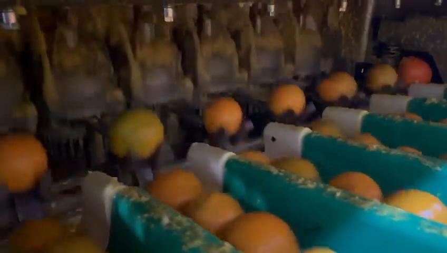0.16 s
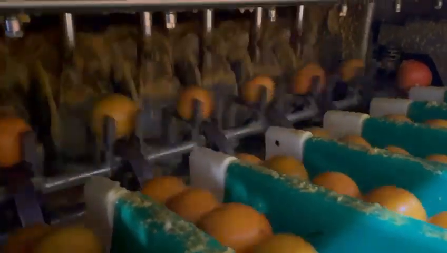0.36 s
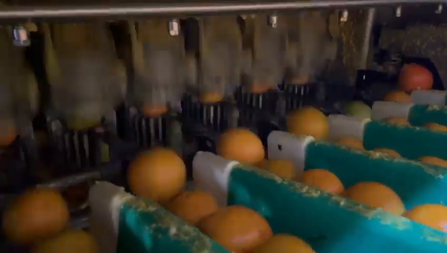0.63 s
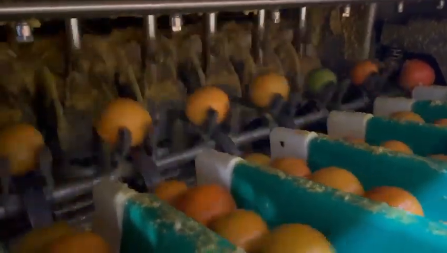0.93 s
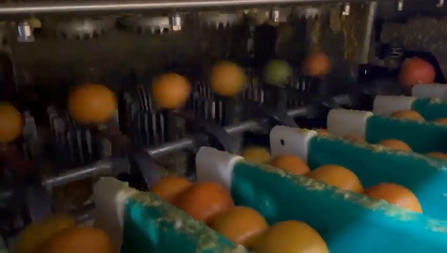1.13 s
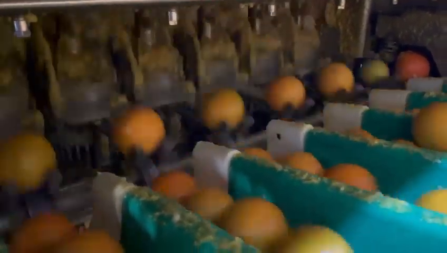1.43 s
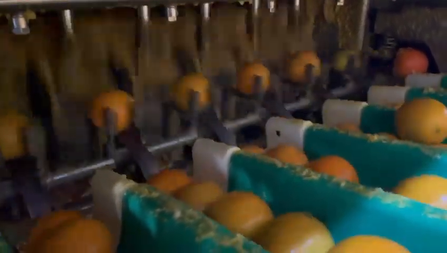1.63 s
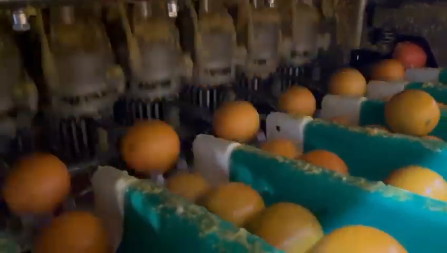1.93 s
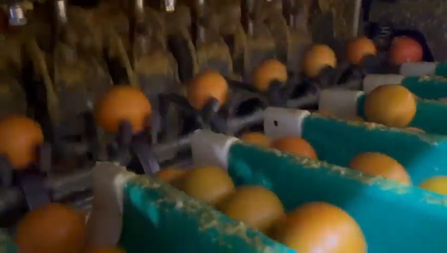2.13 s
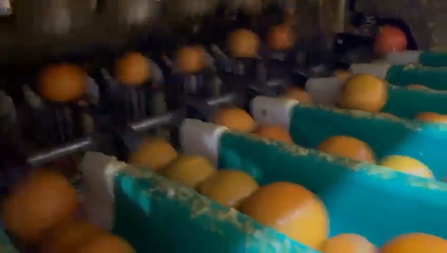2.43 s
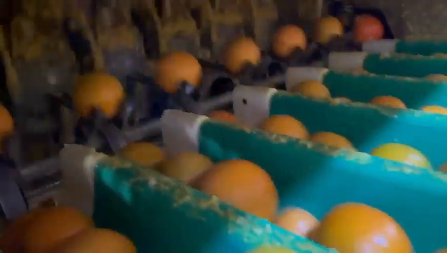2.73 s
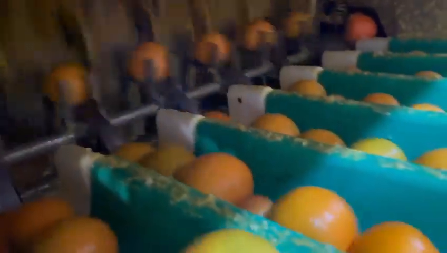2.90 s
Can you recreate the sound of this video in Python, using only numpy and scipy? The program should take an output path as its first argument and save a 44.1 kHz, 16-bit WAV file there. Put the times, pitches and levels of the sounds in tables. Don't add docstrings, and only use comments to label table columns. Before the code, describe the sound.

A citrus juicing machine pounds about every 0.6 seconds: peel crunches and juice hisses, the frame booms, then steel fingers clack and fruit knocks down chutes, over motor hum in a loud factory, heard close up on a phone.

```python
import sys
import numpy as np
from scipy import signal
from scipy.fft import rfft, irfft
from scipy.io import wavfile
from scipy.ndimage import uniform_filter1d

SR = 44100
rng = np.random.default_rng(int(sys.argv[2]) if len(sys.argv) > 2 else 0)


def convert_level_to_amplitude(level_db):
    exponent = np.asarray(level_db, float) / 20
    return 10 ** exponent


def log_audio(samples):
    frames = np.atleast_2d(samples).T
    limited = np.clip(frames, -1, 1)
    pcm = np.round(limited * 32767).astype(np.int16)
    wavfile.write(sys.argv[1], SR, pcm)


N = 134946

# crush/dB, spray/dB, boom/dB, frame/dB
STROKES = [(-16, -6, 4.5, -2.5), (5, 8.5, -1, 0), (1.5, 5.5, -1, 1.5), (4, 7.5, 1.5, 2.5),
           (1.5, 5.5, -0.5, 1), (4, 7.5, 0.5, -0.5)]
STARTS_S = [-.625, 0.0, .632, 1.253, 1.877, 2.5]
# f/Hz, level/dB
CRUSH_TONE = [(250, -15.5), (600, 2.5), (1200, 0.5), (2000, -4), (3400, -1), (5000, -9.5), (8000, -13.5),
              (12000, -23.5)]


def curve(table, at):
    p = np.array(table, float)
    return np.interp(np.log(at + 1), np.log(p[:, 0]), p[:, 1])


def shape(x, gain):
    return irfft(rfft(x) * gain(np.fft.rfftfreq(N, 1 / SR)), N)


def unit(x):
    return x / np.sqrt(np.mean(x ** 2))


def walk(rate):
    k = int(SR / rate)
    held = np.repeat(rng.standard_normal(N // k + 1), k)
    return unit(uniform_filter1d(uniform_filter1d(held, k), k)[:N])


def grains(tone, rough_db, flicker_db, rate):
    x = rfft(rng.standard_normal((2, N)) * convert_level_to_amplitude(rough_db * rng.exponential(size=N)))
    f = np.fft.rfftfreq(N, 1 / SR)
    out = 0
    for k in range(10):
        octave = np.cos(np.pi / 2 * np.clip(np.log2((f + 1) / 25) - k, -1, 1)) ** 2
        band = convert_level_to_amplitude(curve(tone, f)) * octave
        out = out + irfft(x * band, N) * convert_level_to_amplitude(flicker_db * walk(rate))
    return unit(out)


def ring(x, hz, t60):
    return signal.lfilter([1], [1, -np.exp((2j * np.pi * hz - np.log(1000) / t60) / SR)], x).imag


def burst(at, decay, rise=0.0043):
    t = np.maximum(np.arange(N) / SR - at, 0)
    return np.exp(-t / decay) * np.minimum(t / rise, 1)


def effort(table, column):
    t, p = np.arange(N) / SR, np.array(table, float)
    power = 0
    for start, stroke in zip(STARTS_S, STROKES):
        level_db = np.interp(t - start, p[:, 0], p[:, 1], left=-90, right=-90)
        power = power + convert_level_to_amplitude(2 * (level_db + stroke[column]))
    return np.sqrt(power)


def press():
    # t/s after its start, level/dB
    crush_effort = [(.1, -67), (.17, -43.5), (.235, -42.5), (.262, -26), (.295, -29), (.325, -35),
                    (.39, -43.5), (.47, -38.5), (.58, -53)]
    spray_effort = [(.08, -90), (.17, -43), (.24, -45.5), (.275, -33), (.32, -46), (.39, -60), (.46, -42),
                    (.5, -69), (.58, -68)]
    boom_effort = [(.15, -30), (.24, -21.5), (.32, -18), (.385, -29.5), (.42, -20), (.5, -19.5), (.58, -24),
                   (.7, -29.5), (.8, -43.5)]
    # f/Hz, level/dB
    spray_tone = [(1500, -30), (3000, -14), (5000, -5), (8000, -1.5), (10000, -0.5), (12500, -9.5)]
    boom_tone = [(60, -30), (150, -13), (300, 0), (500, -0.5), (800, -9.5), (1300, -16), (2500, -30.5),
                 (6000, -42.5)]
    crush = effort(crush_effort, column=0) * grains(CRUSH_TONE, rough_db=2.5, flicker_db=2.2, rate=60)
    spray = effort(spray_effort, column=1) * grains(spray_tone, rough_db=1.5, flicker_db=3.0, rate=36)
    boom = effort(boom_effort, column=2) * grains(boom_tone, rough_db=3, flicker_db=1.1, rate=20)
    return crush + spray + boom


def frame():
    # f/Hz, width/Hz, level/dB, struck t/s into the stroke, decay/s
    resonances = [(101.66, 22, -26, 0.388, 0.2), (207.5, 29, -20, 0.2206, 0.15),
                  (319.6, 15, -21, 0.289, 0.19), (448.4, 17, -23.5, 0.252, 0.13),
                  (553.5, 11, -26.5, 0.265, 0.1), (786, 10, -28, 0.428, 0.15),
                  (1010, 30, -33.5, .27, 0.093), (1618, 42, -40.5, .3, 0.28)]
    rise_s, rough_share = 0.024, 0.52
    push, t = rng.standard_normal((2, N)), np.arange(N) / SR
    out = 0
    for hz, width, db, at, decay in resonances:
        shake = sum(convert_level_to_amplitude(stroke[3]) * burst(start + at, decay, rise_s)
                    for start, stroke in zip(STARTS_S, STROKES))
        steady = np.sin(2 * np.pi * (hz * t + 0.08 * walk(12) + np.array([[0], [.25]])))
        rough = unit(ring(push, hz, 2.24 / width))
        out = out + convert_level_to_amplitude(db) * shake * (steady + rough_share * rough)
    return out


def fingers():
    # f/Hz, level/dB, t60/s
    modes = [(2223, 0, .06), (2900, -9, .03), (3482, 0, .07), (3591, -6, .05), (3390, -9, .04),
             (4105, -2, .08), (4560, -2, .04), (4700, -2, .04), (5319, -6, .05), (5480, -6, .03)]
    # t/s, ring/dB, low modes/dB, high modes/dB, crack/dB
    clacks = [(.4095, -42, -12, 5, -29), (1.038, -31, -16, -3, -30), (1.659, -31, -6, 4, -22),
              (2.2812, -34, -2, 0, -33), (2.7604, -38, -16, -1, -18), (2.9083, -40, -8, -15, -31),
              (2.997, -36, -4, -2, -26)]
    contact_s, crack_s = .0015, 0.015
    out, crack, t = np.zeros((2, N)), np.zeros(N), np.arange(SR // 18) / SR
    chatter_db = np.tile(1.8 * walk(160), 2)
    envelope = np.minimum(t / contact_s, 1) * np.cos(np.pi / 2 * t / t[-1])
    for s, db, low_db, high_db, crack_db in clacks:
        luck, at = rng.random((len(modes), 3)), int(s * SR)
        for (hz, mode_db, t60), (turn, other, size) in zip(modes, luck):
            share_db = low_db if hz < 3000 else high_db if hz > 3700 else 0
            level_db = db + mode_db + share_db + 3 * size + chatter_db[at:at + len(t)] - 60 * t / t60
            tone = np.sin(2 * np.pi * (hz * t + np.array([[turn], [other]])))
            out[:, at:at + len(t)] += (convert_level_to_amplitude(level_db) * envelope * tone)[:, :N - at]
        crack += convert_level_to_amplitude(crack_db) * burst(s, crack_s, contact_s)
    return out + crack * grains(CRUSH_TONE, rough_db=2, flicker_db=0, rate=5)


def pings():
    # t/s, f/Hz, level/dB,
    # t60/s
    rods = [(.335, 3200, -33, .1), (.342, 2500, -30, .05), (0.39, 3850, -35, 0.12), (.372, 3500, -37, .6),
            (.42, 2560, -41, 0.092), (.905, 2150, -30, 0.11), (1.045, 2580, -33, 0.22),
            (.95, 2900, -34, 0.22), (.985, 3470, -42, .3), (.996, 3480, -35, .2), (1.038, 3490, -26, .15),
            (1.09, 5570, -37, .15), (1.502, 1293, -23, 0.41), (1.525, 1870, -31, .2),
            (1.667, 4105, -27, .08), (1.659, 4640, -26, .05), (1.664, 3490, -25, .08),
            (1.658, 2223, -21, .085), (1.66, 5420, -31, .05), (2.286, 3400, -34, .07),
            (2.298, 3490, -33, .12), (2.29, 4120, -38, .12), (2.284, 5300, -38, .05),
            (2.36, 2100, -42, .15), (1.9, 2800, -34, .06), (2.21, 3400, -37, .08)]
    # t/s, f/Hz, level/dB, t60/s
    thumps = [(.3, 203, -17.5, 0.33), (.9, 289, -19, 0.27), (.94, 220, -21, .3), (1.041, 430, -20, .3),
              (1.3, 205, -22, 0.34), (1.54, 453, -22, .3), (1.66, 399, -22, 0.28), (1.74, 330, -20, .3),
              (1.84, 381, -22, 0.33), (2.16, 298, -21, 0.33), (2.201, 203, -19, 0.32),
              (2.77, 554, -18, 0.35), (.46, 97, -19, .4), (.92, 96, -20, .4), (1.74, 103, -19, .4),
              (2.26, 102, -19, .4), (2.88, 96, -20, .4)]
    struck = rods + thumps
    out, t = np.zeros((2, N)), np.arange(SR // 14) / SR
    chatter_db = np.tile(2.5 * walk(120), 2)
    for (s, hz, db, t60), turn in zip(struck, rng.random((len(struck), 2, 1))):
        at = int(s * SR)
        level = convert_level_to_amplitude(db + chatter_db[at:at + len(t)] - 60 * t / t60)
        envelope = np.minimum(t / (.003 + 3 / hz), 1) * np.cos(np.pi / 2 * t / t[-1])
        phase = turn[0] + (turn - turn[0]) * min(hz / 2000, 1)
        out[:, at:at + len(t)] += level * envelope * np.sin(2 * np.pi * (hz * t + phase))
    return out


def knocks():
    # t/s, level/dB, centre f/Hz, decay/s
    ticks = [(.008, -28.5, 3270, 0.021), (0.141, -25.5, 3600, 0.021), (.49, -27.5, 4700, 0.0081),
             (0.809, -33, 5130, 0.018), (0.893, -25, 2140, 0.019), (1.031, -27, 3900, 0.017),
             (1.088, -34, 5500, 0.014), (.845, -27, 10000, 0.018), (.92, -31, 10000, 0.022),
             (1.688, -35, 10000, 0.025), (1.424, -33.5, 5030, 0.018), (1.489, -29, 1400, 0.025),
             (1.691, -49, 2460, 0.025), (1.747, -29, 4900, 0.019), (1.765, -30.5, 3600, 0.01),
             (1.882, -28, 3450, 0.012), (2.05, -33.5, 5500, 0.018), (2.1126, -26, 4040, 0.0092),
             (2.145, -20.5, 2920, 0.016), (2.3311, -31.5, 5040, 0.017), (2.669, -34, 4500, 0.013),
             (2.709, -30, 4000, 0.009), (2.849, -26, 4000, 0.0071)]
    out = np.zeros((2, N))
    noise = signal.lfilter([1, -1], [1, -.8], rng.standard_normal((2, N)))
    for s, db, hz, decay in ticks:
        part = slice(int(s * SR), int(s * SR) + SR // 8)
        tone = unit(ring(noise[:, part], hz, 2.8 / hz)) + 0.13 * noise[:, part]
        out[:, part] += convert_level_to_amplitude(db) * burst(s, decay)[part] * tone
    return out


def chain():
    # f/Hz, t60/s, level/dB
    link = [(4680, 0.016, -7), (5200, .006, -14), (7240, 0.0019, 2.5), (8330, .004, -14.5)]
    # t/s, level/dB
    slap = [(0, -34), (.22, -32), (.5, -37), (.7, -62), (.85, -33.5), (1.1, -34.5), (1.25, -36),
            (1.72, -31.5), (1.85, -30.5), (2.0, -45.5), (2.36, -33.5), (2.6, -50), (2.85, -41.5),
            (2.95, -26), (3.06, -34)]
    start_s, spacing_s, decay_s, scatter_db = .0110, .03287, .006, 2.0
    times, p, ticks = np.arange(start_s, N / SR, spacing_s), np.array(slap, float), np.zeros(N)
    luck = rng.standard_normal((len(times), 2))
    at = np.clip((times + .002 * luck[:, 0]) * SR, 0, N - 1).astype(int)
    ticks[at] = convert_level_to_amplitude(np.interp(times, p[:, 0], p[:, 1]) + scatter_db * luck[:, 1])
    gate = signal.lfilter([1], [1, -np.exp(-1 / SR / decay_s)], ticks)
    noise = rng.standard_normal((2, N))
    return gate * sum(convert_level_to_amplitude(db) * unit(ring(noise, hz, t60)) for hz, t60, db in link)


def echo(x):
    t60_s, level_db = 0.18, -6
    t = np.arange(SR // 2) / SR
    tail = rng.standard_normal((2, len(t))) * np.exp(-np.log(1000) * t / t60_s) * (t > .004)
    tail = tail / np.sqrt(np.sum(tail[0] ** 2))
    return x + convert_level_to_amplitude(level_db) * signal.fftconvolve(x, tail, axes=1)[:, :N]


def hall():
    # f/Hz, level/dB rms, wobble/dB
    motor = [(50.3, -33, 2), (101.5, -35.5, 7.5)]
    # f/Hz, level/dB
    rumble_tone = [(25, -32), (50, 2), (130, -4.5), (300, 0), (550, -6.5), (1200, -19.5), (2500, -30),
                   (11000, -45.5)]
    t, hum = np.arange(N) / SR, 0
    for hz, db, wobble_db in motor:
        level = np.sqrt(2) * convert_level_to_amplitude(db + wobble_db * walk(11.0))
        hum = hum + level * np.sin(2 * np.pi * (hz * t + 0.12 * walk(5.98)))
    rumble = convert_level_to_amplitude(-20) * grains(rumble_tone, rough_db=1.5, flicker_db=1.1, rate=22)
    return rumble + hum * np.array([[1], [.6]])


def scene():
    # f/Hz, width/Hz, level/dB
    hall_peaks = [(635, 27, 1), (777, 34, 4.5), (1006, 27, 2.5), (1132, 36, 3), (1315, 27, 3.5), (1424, 77, -1),
                  (1613, 64, 3.5), (1840, 50, -1.5), (1940, 22, 1)]

    def hall_gain(f):
        return convert_level_to_amplitude(sum(db * np.exp(-((f - hz) / w) ** 2) for hz, w, db in hall_peaks))

    return shape(hall() + press(), hall_gain) + frame() + echo(fingers() + pings() + knocks() + chain())


def starve(x, keep):
    sharp_s = [.889, 1.028, 1.284, 1.655, 1.678, 1.84, 2.33, 2.768]
    f, t, z = signal.stft(x, SR, nperseg=1024)
    luck = rng.random((172, len(t) // 3 + 1))
    luck = np.repeat(np.repeat(luck, 3, axis=0), 3, axis=1)[:len(f), :len(t)]
    sharp = np.min(np.abs(t[:, None] - np.array(sharp_s)), axis=1) < .012
    sharp = sharp & (f[:, None] < 11750)
    passes = (luck < curve(keep, f)[:, None]) | sharp
    return signal.istft(z * passes, SR, nperseg=1024)[1][:N]


def roll_off(x):
    return signal.sosfilt(signal.butter(12, 12090, fs=SR, output="sos"), x)


def record(dry):
    # f/Hz, level/dB
    sum_tone = [(20, 1), (6100, 0), (6900, -12), (7200, -22), (8300, -19.5), (8600, -8), (9500, -3),
                (11900, -3)]
    diff_tone = [(40, 0), (100, -15.5), (300, -9), (800, 0.5), (3400, -3), (7000, -1), (9300, -3.5),
                 (10500, -26)]
    # f/Hz, width/Hz, level/dB
    diff_dips = [(2450, 330, -5.5), (4750, 710, -7.5)]
    # f/Hz, lean toward the left [-1 to 1], negative toward the right
    lean_left = [(30, -1), (100, -0.21), (300, -0.12), (1000, 0.37), (2500, 0.11), (8000, 0.3)]
    # f/Hz, share of the time a band survives [0-1]
    keep_sum = [(6300, 1), (6750, .15), (6950, 0), (8300, 0), (8700, .2), (8900, .2), (9050, .75),
                (9600, .86), (11250, .86), (11700, 0)]
    keep_diff = [(2000, 1), (2450, .3), (2950, 1), (3600, 1), (4800, .08), (6500, 1), (9100, 1), (9900, 0)]
    ceiling = 1.05

    def lean(f):
        return np.clip(curve(lean_left, f), -.95, .95)

    def diff_gain(f):
        dips_db = sum(db * np.exp(-((f - hz) / w) ** 2) for hz, w, db in diff_dips)
        return convert_level_to_amplitude(curve(diff_tone, f) + dips_db)

    other = shape(dry[0], lean) + shape(dry[1], lambda f: np.sqrt(1 - lean(f) ** 2))
    mid = shape(dry[0], lambda f: convert_level_to_amplitude(curve(sum_tone, f)))
    side = shape(other, diff_gain)
    left, right = ceiling * np.tanh(np.array([mid + side, mid - side]) / ceiling)
    mid = starve((left + right) / 2, keep_sum)
    side = starve((left - right) / 2, keep_diff)
    return roll_off(np.array([mid + side, mid - side]))


dry = scene()
out = record(dry)
log_audio(out)
```